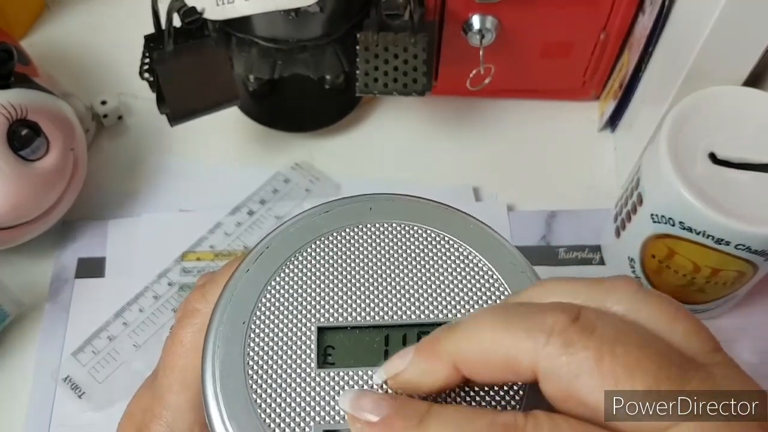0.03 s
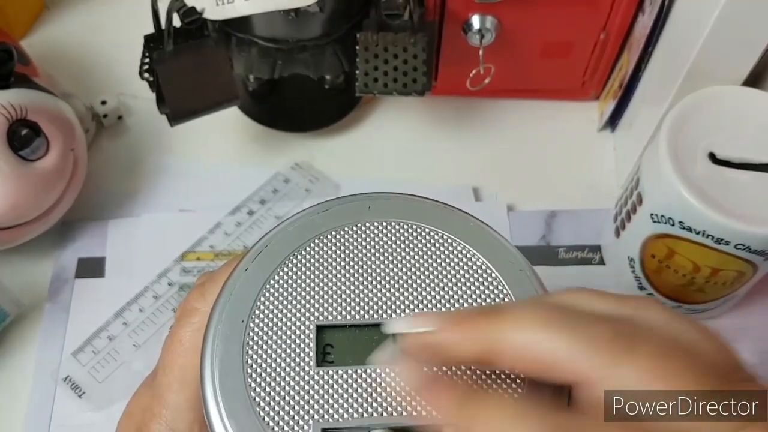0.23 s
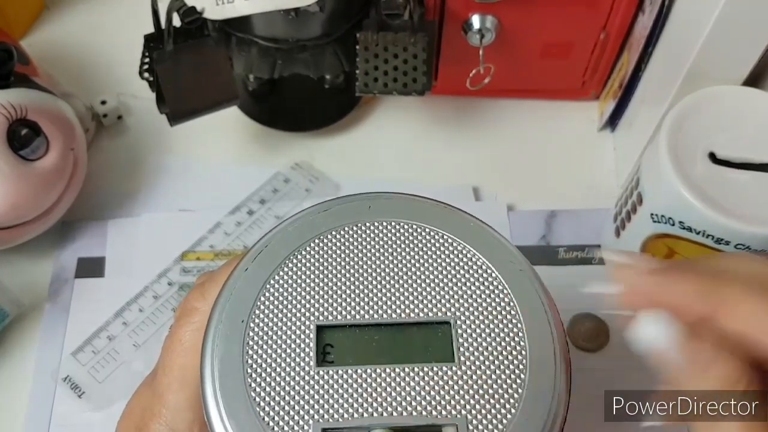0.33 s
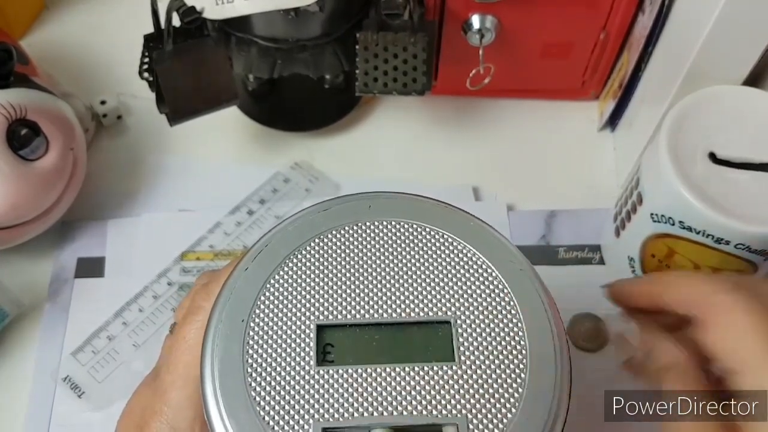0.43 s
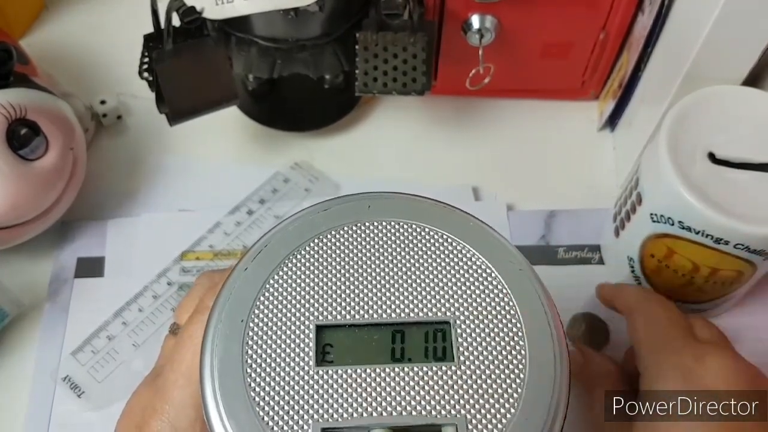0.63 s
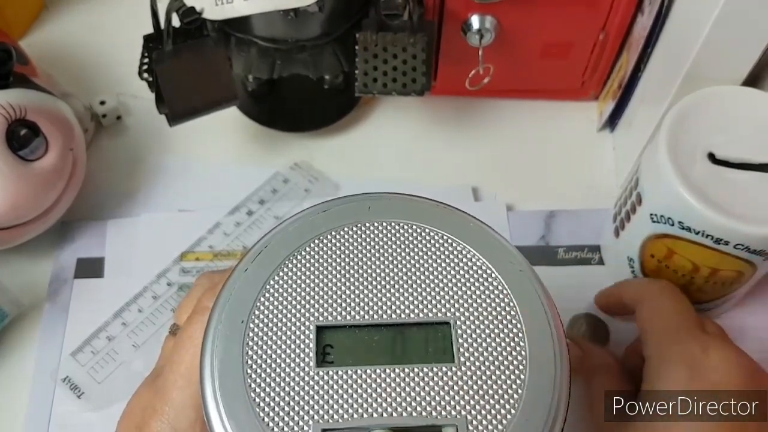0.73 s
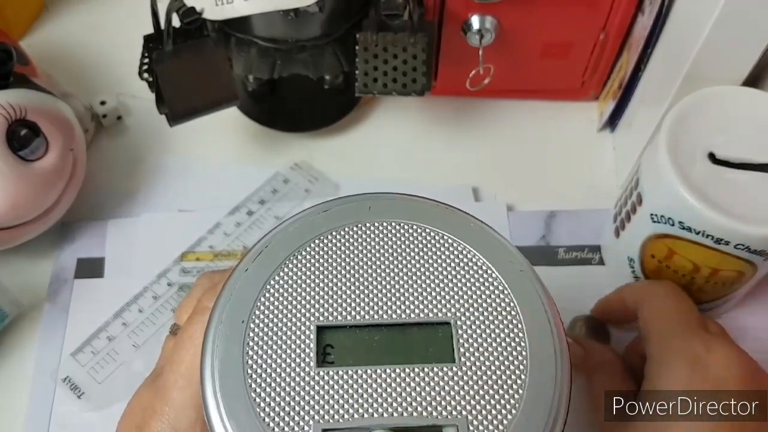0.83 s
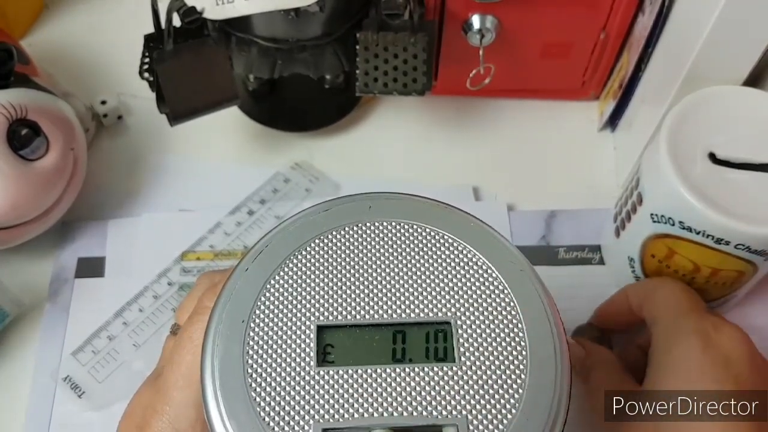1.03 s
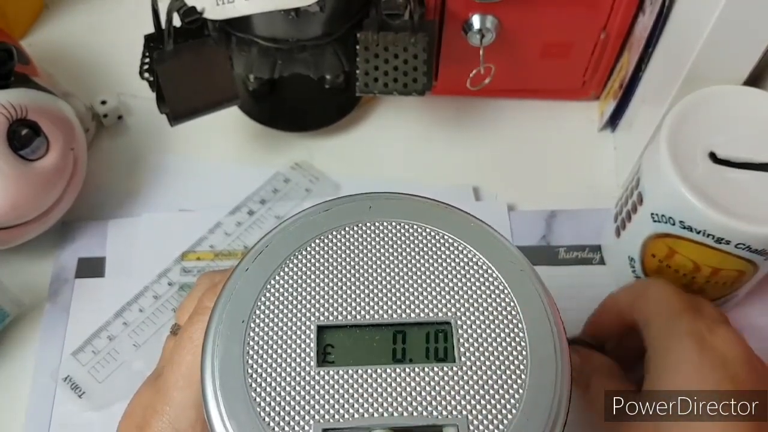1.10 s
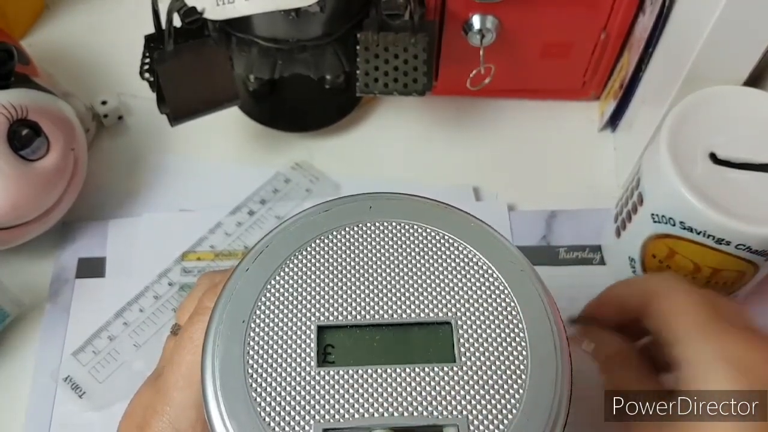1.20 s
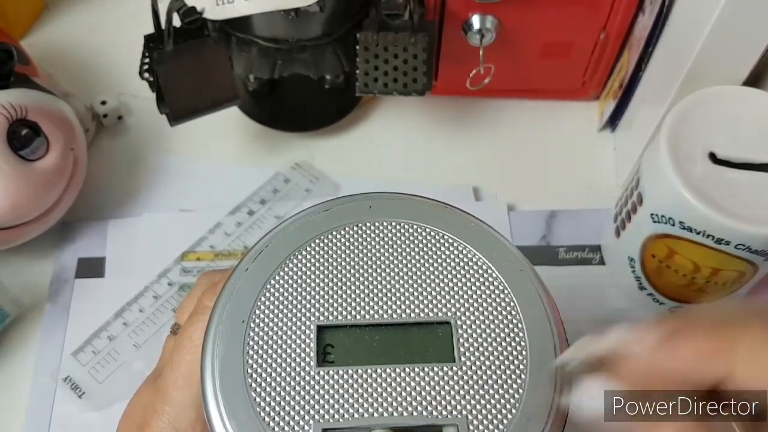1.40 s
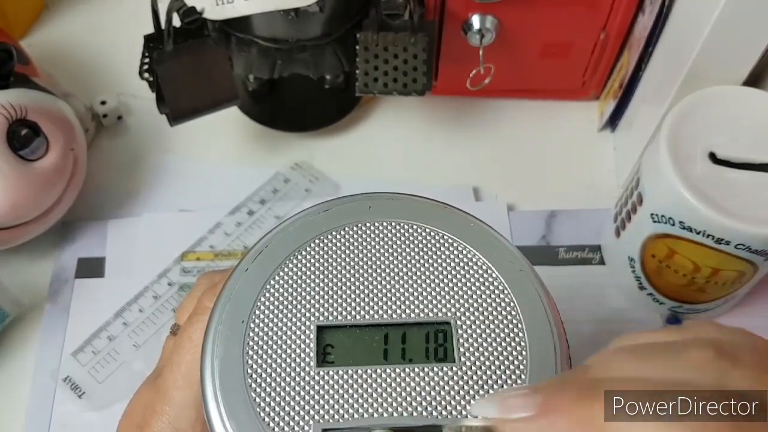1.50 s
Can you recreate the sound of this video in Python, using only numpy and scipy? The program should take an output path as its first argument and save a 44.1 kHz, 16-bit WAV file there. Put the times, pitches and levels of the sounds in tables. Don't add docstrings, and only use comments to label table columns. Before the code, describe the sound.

One coin scrapes and snaps into a money tin, then soft desk knocks follow.

```python
import sys
import numpy as np
from scipy import signal
from scipy.fft import rfft, irfft
from scipy.io import wavfile
from scipy.ndimage import uniform_filter1d

SR = 44100
rng = np.random.default_rng(int(sys.argv[2]) if len(sys.argv) > 2 else 0)


def undo_db(level):
    steps = np.asarray(level, float) / 20
    return 10 ** steps


def waveform_to_disk(signal):
    frames = np.transpose(np.atleast_2d(signal))
    scaled = np.clip(frames, -1, 1) * 32767
    samples = np.round(scaled).astype(np.int16)
    wavfile.write(sys.argv[1], SR, samples)


N = 68355

# f/Hz, level/dB, t60/s, left-right/dB
LID_MODES = [(900, -19.5, 0.055, 5.5), (1716, -5.5, 0.15, 1), (1992, -3.5, 0.066, 7.5),
             (2260, -11, 0.17, -1.5), (2545, -8, 0.025, 2.5), (3545, -10.5, 0.0442, -0.5),
             (4714, -6, 0.025, 0.5), (5600, -10.5, 0.029, 6), (6330, -8, 0.012, 14),
             (7316, -8, 0.039, 10.5), (11535, -12, 0.015, 8.5), (14350, -15, 0.022, 5.5),
             (1285, -23.5, 0.012, 2.5)]


def evened(x):
    return x / np.sqrt(np.mean(x ** 2) + 1e-20)


def read(points, hz):
    f, value = np.transpose(points)
    return np.interp(np.log(hz + 1), np.log(f + 1), value)


def curve(points):
    s, db = np.transpose(points)
    return undo_db(np.interp(np.arange(N) / SR, s, db, left=-200, right=-200))


def add(mix, s, sound):
    part = mix[:, max(round(s * SR), 0):][:, :sound.shape[-1]]
    part += sound[..., :part.shape[1]]


def colour(x, gain):
    return irfft(rfft(x) * gain(np.fft.rfftfreq(x.shape[-1], 1 / SR)), x.shape[-1])


def low_cut(hz, corner_hz):
    return (hz / np.hypot(hz, corner_hz)) ** 2


def ring(modes, t, phase, lean=np.ones((2, 1))):
    hz, db, t60 = np.transpose(modes)[:, :, None]
    waves = np.sin(2 * np.pi * hz * t + phase[:, :, None])
    return (lean[:, :, None] * undo_db(db - 60 * t / t60) * waves).sum(1)


def detuned(modes, share):
    return [(hz * (1 + share * rng.standard_normal()), db, t60) for hz, db, t60, _ in modes]


def clicks(per_s, spread_db):
    chance, side, size = rng.random((3, N))
    heights = np.sign(side - .5) * undo_db(-spread_db * np.log(size + 0.0049))
    return evened((chance < per_s / SR) * heights)


def crack(t, db, t60):
    return np.diff(rng.standard_normal((2, len(t) + 1))) * undo_db(db - 60 * t / t60)


def catch():
    # t/s, level/dB, left-right/dB
    snaps = [
        (.2128, -3.5, 1.5),
        (0.2138, -11.5, 0.5),
        (.2150, -10.5, -1.5),
        (.2172, -14.5, -5.5),
        (0.2199, -24.5, -4.5),
        (.0155, -41, -0.5),
        (.1835, -44, 5.5),
    ]
    choke_s, choke_t60 = .0052, .006
    out, t = np.zeros((2, N)), np.arange(2000) / SR
    base = rng.uniform(0, 2 * np.pi, (2, len(LID_MODES)))
    lean = undo_db(np.outer([.5, -.5], np.transpose(LID_MODES)[3]))
    for s, db, pan_db in snaps:
        phase = base + 0.14 * rng.standard_normal(base.shape)
        hit = ring(detuned(LID_MODES, 0.012), t, phase, lean)
        hit = hit * undo_db(-60 * np.maximum(t - choke_s, 0) / choke_t60)
        hit = hit + crack(t, -7, 0.011)
        sides = undo_db([[db + pan_db / 2], [db - pan_db / 2]])
        add(out, s, .5 * hit * np.minimum(t / 0.00015, 1) * sides)
    return out


def coin():
    # t/s, force/dB
    scrape = [
        (.183, -68),
        (.185, -48.5),
        (.197, -57),
        (.2070, -38.5),
        (.2088, -28.5),
        (.236, -28.5),
        (.256, -35),
        (.264, -31.5),
        (.31, -56.5),
    ]
    # f/Hz, level/dB
    grit_tone = [(200, -41.5), (650, -10.5), (1400, -7), (2200, -9), (3500, -11), (7000, -28), (13000, -21),
                 (16000, -35)]
    slips_per_s, spots, full_force_db, grit_law = 3000, 8, -27.5, 2.4
    t, force = np.arange(1500) / SR, curve(scrape)
    body, gate = 0, 0
    for spot in range(spots):
        slips = clicks(slips_per_s / spots, 3.)
        phase = rng.uniform(0, 2 * np.pi, (2, len(LID_MODES)))
        shape = undo_db(-60 * t / 0.064) * ring(detuned(LID_MODES, .14), t, phase)
        shape = shape / np.linalg.norm(shape)
        body = body + signal.oaconvolve((force * slips)[None], shape, axes=1)[:, :N] / 2
        gate = gate + abs(slips)
    grit = rng.standard_normal((2, N)) * (.4 + uniform_filter1d(gate, size=30))
    grit = evened(colour(grit, lambda hz: undo_db(read(grit_tone, hz))))
    grit = grit * force * (force / undo_db(full_force_db)) ** grit_law
    return (undo_db(-2.5) * body + undo_db(0.5) * grit) * undo_db([[1.2], [-1.2]])


def bounces():
    # t/s, level/dB, brightness/(dB per octave)
    hits = [(0.1875, -38.5, -2.5), (0.199, -28, -9), (.2050, -41.5, 3), (.2088, -31, 2.5),
            (0.2106, -26.5, -0.5), (.2215, -22, 1.5), (.2247, -20.5, -1), (.2278, -29.5, -2),
            (.2312, -17, -2), (.2339, -24, -3.5), (.2364, -28, 1), (0.2382, -26.5, 3), (0.247, -30, 1),
            (.2489, -29.5, -1), (.2530, -31, 2), (.2617, -27, 4.5), (.2633, -32, 3.5), (0.266, -33.5, 0),
            (0.276, -38, -2.5), (0.278, -37.5, -3), (.2867, -37, -4.5), (.2933, -34, 0.5),
            (.3020, -40, 1.5)]
    # f/Hz, level/dB, t60/s
    wall = [(630, -13.5, 0.01), (950, -11.5, 0.027), (1726, 0, 0.015), (2045, -4, .025), (2170, -3.5, .06),
            (2344, -3, 0.068), (2480, -7.5, 0.03), (2660, -5.5, 0.072), (3000, -6, 0.054),
            (3630, -6.5, .035), (4052, -9, 0.034), (5430, -13, .025), (6100, -11.5, .025),
            (7060, -11.5, 0.037)]
    detune, mode_spread_db = 0.015, 4
    out, t = np.zeros((2, N)), np.arange(4000) / SR
    hz, db, t60 = np.transpose(wall)
    for s, hit_db, tilt_db in hits:
        off, mix, phase, turn = rng.standard_normal((4, len(wall)))
        mode_db = db + mode_spread_db * mix + tilt_db * np.log2(hz / 2000)
        modes = np.transpose([hz * (1 + detune * off), mode_db, t60])
        hit = ring(modes, t, 3 * phase + np.outer([0, 2.2], turn))
        hit = hit + crack(t, -4.5 + 2 * tilt_db, .012)
        add(out, s, hit * np.minimum(t / 0.00032, 1) * undo_db(hit_db - 10.0))
    return out


def tin():
    # f/Hz, level/dB, t60/s
    partials = [(656.6, 0, 1.1), (2240, -10, 0.58), (2980, -16.5, 0.87), (3210, -11.5, 0.71),
                (4813, -20, 0.27)]
    start_s, rise_s, held_s, stop_t60 = 0.27, 0.025, 0.83, 0.058
    out, t = np.zeros((2, N)), np.arange(SR) / SR
    phase = rng.uniform(0, 7.8, len(partials)) + np.outer([0, 1], np.transpose(partials)[0] / 700)
    sound = undo_db(-45) * ring(partials, t, phase) * np.minimum(t / rise_s, 1)
    grip = undo_db(-60 * np.maximum(t + start_s - held_s, 0) / stop_t60)
    add(out, start_s, sound * grip)
    return out


def knocks():
    # t/s, level/dB, f/Hz, t60/s
    blows = [(0, -46, 179.2, 0.26), (.004, -44.5, 82, 0.15), (0.016, -39.5, 335, 0.028),
             (0.207, -22.5, 194, 0.026), (.224, -33, 124, 0.11), (.238, -36.5, 657, 0.15),
             (.186, -34, 154, 0.02), (.143, -48, 225, 0.049), (.193, -30, 353, 0.068),
             (.2235, -19.5, 900, 0.024), (0.213, -27, 372, 0.051), (.2165, -18.5, 706, 0.026),
             (0.2612, -20.5, 127.4, 0.082), (.2216, -38, 2480, 0.13), (.2248, -26.5, 2705, 0.1),
             (.2312, -28.5, 2170, 0.1), (.262, -30.5, 470, 0.031), (0.2843, -34.5, 131, 0.09),
             (0.3138, -55, 129.3, 0.28), (0.348, -48, 137, 0.31), (0.477, -46.5, 347, 0.063),
             (0.559, -58.5, 503.6, 0.096), (0.788, -55, 507.6, 0.07), (0.935, -49, 296, 0.022),
             (0.936, -51, 111, 0.18), (0.953, -46.5, 253, 0.036), (1.0402, -41, 129.6, 0.11),
             (1.043, -36, 710, 0.011), (1.056, -48, 130, 0.17), (1.227, -42, 284, 0.13),
             (1.2431, -30, 300, 0.032), (1.2505, -27, 240, 0.031), (1.2585, -35, 170, 0.042),
             (1.269, -44.5, 200, 0.066), (1.314, -49, 130, 0.039), (1.2868, -33, 365, 0.02),
             (1.2865, -37.5, 730, 0.01), (1.292, -36.5, 132, 0.14), (1.208, -47, 262.7, 0.15)]
    rise_s, partner_ratio, partner_db, lag_s = 0.00054, 1.3, -16, .00006
    out, t = np.zeros((2, N)), np.arange(SR // 2) / SR
    for s, db, hz, t60 in blows:
        lag = 2 * np.pi * hz * lag_s * np.array([[1.5, 0], [-1.5, -2]])
        modes = [(hz, db, t60), (hz * partner_ratio, db + partner_db, t60 * 0.37)]
        add(out, s, ring(modes, t, lag) * (1 - np.exp(-t / (rise_s + 0.17 / hz))))
    return out


def ticks():
    # t/s, level/dB, centre f/Hz, width/octaves, t60/s
    taps = [(0, -55, 9000, 3.3, 0.0024), (.014, -47, 7250, 0.24, 0.0088), (0.012, -62.5, 13000, 1, 0.06),
            (.0165, -41, 1930, .4, 0.031), (.038, -56, 2030, 0.43, 0.033), (0.0528, -50, 2290, 1.2, 0.023),
            (0.018, -52, 3350, 0.47, 0.092), (.365, -53.5, 3600, 1.4, 0.04),
            (0.7394, -62, 2740, 0.82, 0.022), (0.7753, -60, 2500, .6, 0.022),
            (.791, -62.5, 3000, 3.3, 0.0077), (0.8293, -55.5, 3960, 4.06, 0.013),
            (.937, -69, 2430, 1.1, .02), (.951, -72, 2800, 0.82, 0.018), (1.0434, -50.5, 2860, 0.67, 0.014),
            (1.0433, -59, 8000, 3.7, .012), (1.0647, -51.5, 12500, 0.55, 0.011),
            (1.066, -63, 12600, 0.66, 0.064), (1.0664, -49, 2570, 2.3, 0.02),
            (1.071, -68.5, 3900, 0.72, 0.077), (1.212, -57, 8500, 3.2, 0.016),
            (1.216, -70, 13200, 0.32, .3), (1.239, -69.5, 6000, 1.97, 0.11), (.2615, -40.5, 11000, 1.5, .1),
            (1.2698, -60.5, 9000, 2.2, 0.017), (1.269, -72.5, 4080, 0.41, 0.13),
            (1.49, -65, 2490, 1.26, 0.035)]
    out, t = np.zeros((2, N)), np.arange(4096) / SR
    for s, db, centre_hz, octaves, t60 in taps:
        def tone(hz):
            distance = np.log2((hz + 1) / centre_hz) / octaves
            return np.exp(-distance ** 2 * 2) / np.sqrt(hz + 200)
        burst = evened(colour(rng.standard_normal((2, len(t))), tone))
        add(out, s, burst * undo_db(db - 60 * t / t60) * np.minimum(t / 0.00031, 1))
    return out


def rub():
    # t/s, pressure/dB
    pressure = [(0, -47.5), (.06, -69), (.12, -65), (.48, -64.5), (.74, -77.5), (.8, -61), (.9, -62.5),
                (.95, -52.5), (1, -75), (1.05, -55), (1.12, -75.5), (1.19, -68.5), (1.24, -54),
                (1.31, -66.5), (1.36, -71), (1.55, -72.5)]
    # f/Hz, level/dB
    rub_tone = [(40, -29), (120, 0), (380, -9), (1000, -16), (2500, -25), (5000, -45.5), (15000, -56)]
    grains_per_s, same = 290, .9
    a = clicks(grains_per_s, 2.0) + .8 * rng.standard_normal(N)
    b = clicks(grains_per_s, 4.3)
    pair = np.array([a, same * a + np.sqrt(1 - same ** 2) * b])
    return curve(pressure) * evened(colour(pair, lambda hz: undo_db(read(rub_tone, hz))))


def air():
    # f/Hz, level/dB
    air_tone = [(20, -11), (70, 2), (200, -8), (600, -18.5), (1500, -16.5), (3500, -24.5), (9000, -34.5),
                (14000, -28.5)]
    # f/Hz, share
    likeness = [(60, 0.56), (380, 0.25), (2380, 0.063), (15000, 0.021)]
    # f/Hz, left-right/dB
    air_lean = [(150, -2.5), (500, 0.5), (1000, 8.5), (2300, 9.5), (4000, -2), (15000, 1.5)]
    # f/Hz, width/Hz, level/dB
    fan = [(1186, 190, 9.3), (1290, 630, 5.1), (1940, 500, 5.6)]
    frames, hz = N // 256 + 5, np.fft.rfftfreq(1024, 1 / SR)
    a, b, c, d, patches = rng.standard_normal((frames, 513, 5)).T
    patches = uniform_filter1d(uniform_filter1d(patches, size=8, axis=0), size=8, axis=1)
    same, left = read(likeness, hz)[:, None], a + 1j * b
    z = np.array([left, same * left + np.sqrt(1 - same ** 2) * (c + 1j * d)])
    tone_db = read(air_tone, hz) + sum(db * np.exp(-((hz - f) / w) ** 2) for f, w, db in fan)
    lean_db = np.outer([.5, -.5], read(air_lean, hz))
    z *= undo_db((tone_db + lean_db)[:, :, None] + 0.52 * evened(patches))
    return undo_db(-60) * evened(signal.istft(z, nperseg=1024, noverlap=768)[1][:, :N])


def room(x):
    # f/Hz, t60/s
    decay = [(200, 0.24), (1000, 0.26), (4000, 0.25), (12000, 0.24)]
    taps = np.zeros((2, SR // 2))
    at = np.arange(120, SR // 2 - 20, 20)
    at = at + rng.integers(0, 20, (2, len(at)))
    np.put_along_axis(taps, at, rng.choice([-1., 1.], at.shape), 1)
    hz, t, z = signal.stft(taps, SR, nperseg=256)
    tail = signal.istft(z * undo_db(-60 * t / read(decay, hz)[:, None]), SR, nperseg=256)[1]
    return signal.fftconvolve(x, tail / np.linalg.norm(tail[0]), axes=1)[:, :N]


def scene():
    sharp = catch() + coin() + ticks() + bounces()
    soft = knocks() + rub()
    metal = tin()
    sharp = sharp + undo_db(-13) * room(sharp)
    mid = sharp.mean(0)
    sharp = mid + colour(sharp - mid, lambda hz: low_cut(hz, 900))
    echo = colour(room(soft) + room(soft)[0], lambda hz: low_cut(hz, 220))
    return sharp + soft + metal + undo_db(-8.5) * echo + air()


def top_cut(x):
    return signal.sosfilt(signal.butter(12, 16480, fs=SR, output="sos"), x)


def record(dry):
    low_cut_hz, top_hz = 48, 15600

    def limits(hz):
        return (hz / np.hypot(hz, low_cut_hz)) ** 3 * np.clip((top_hz - hz) / 300 + 1, .06, 1)
    band = colour(dry, limits)
    mix = 1.164 * np.tanh(band / 1.116) - .0005
    return top_cut(mix)


dry = scene()
out = record(dry)
waveform_to_disk(out)
```